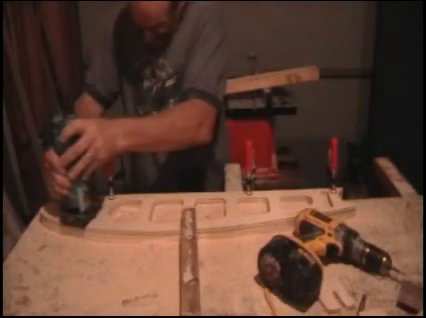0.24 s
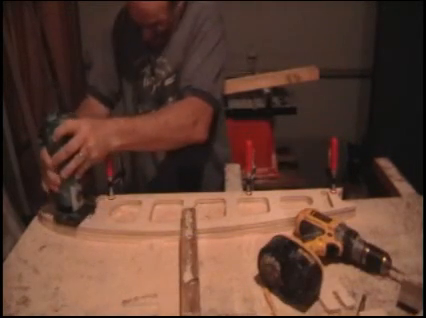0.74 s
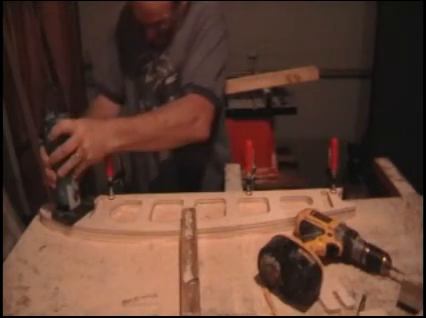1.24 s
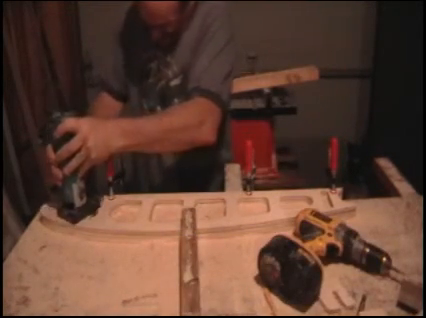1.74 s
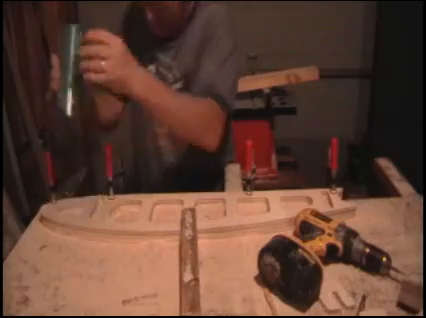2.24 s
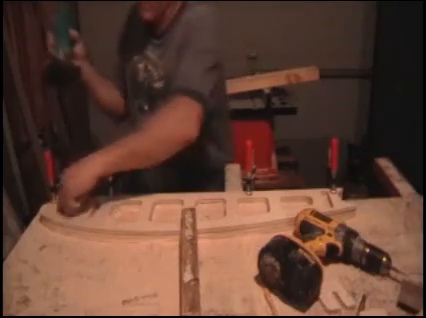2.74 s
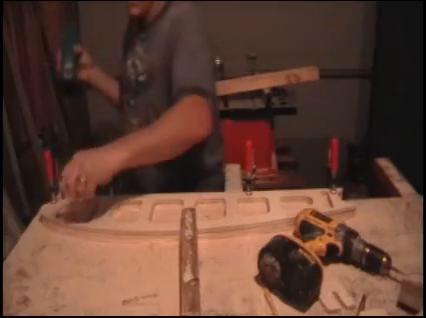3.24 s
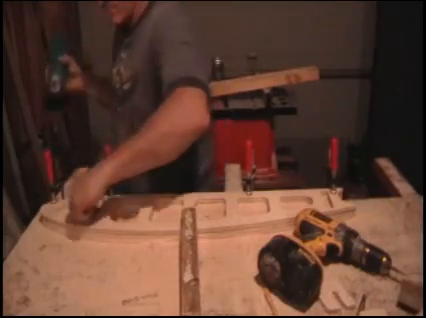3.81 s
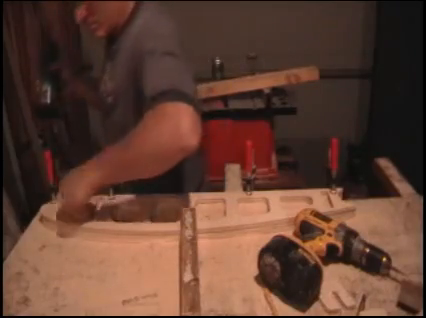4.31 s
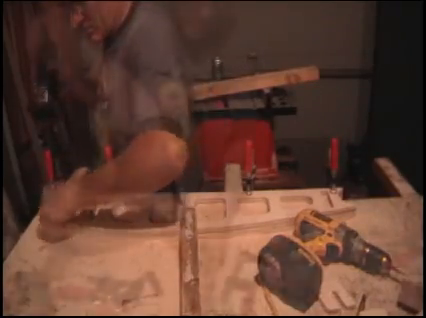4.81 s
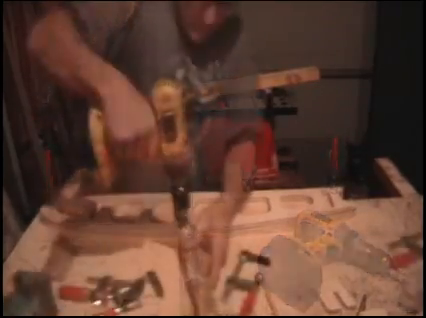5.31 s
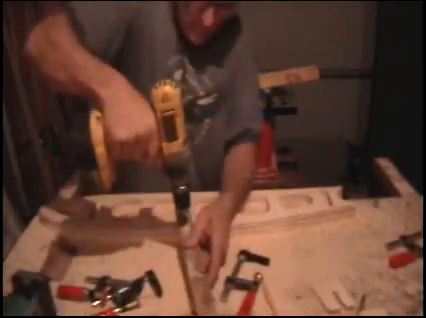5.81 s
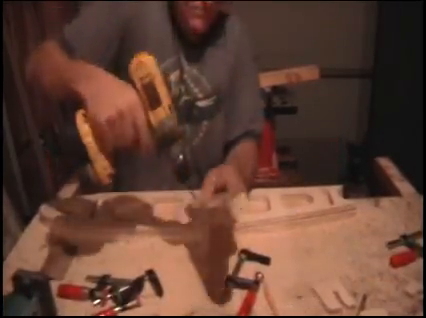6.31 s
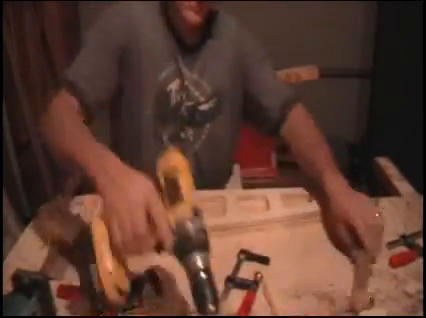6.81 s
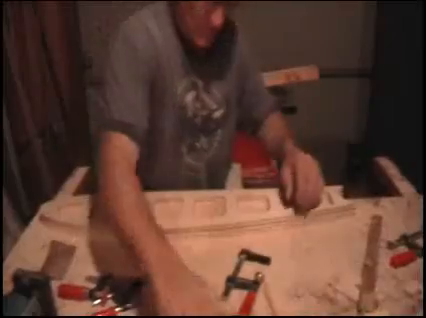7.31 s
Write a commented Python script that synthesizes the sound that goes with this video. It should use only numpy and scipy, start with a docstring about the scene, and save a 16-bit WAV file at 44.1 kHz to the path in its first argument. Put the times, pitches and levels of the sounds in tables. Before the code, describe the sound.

From 0 s a small router roars close by in a garage: rushing air and brush noise, with a rough, buzzing bearing rattle against a plywood template as the motor climbs quickly in pitch. The rattle fades by about 0.8 s, leaving uneven low hums, a wood buzz and a high whine that wavers and dips. Around 2 s the router lifts; the buzz goes and it runs on freely, brighter and steady, with a faint bump at 3.3 s and a dull one at 4.8 s. At 5.1 s it cuts abruptly to a cordless drill, a gritty whirr with gear whine and about nine irregular thumps. Near 6 s it stops with a brief rasp and dies away. Light clicks follow over quiet air, then a hard knock at 6.7 s with clatter and faint steel ringing, and another loud knock at 7.23 s trailed by smaller thuds and ticks. The small microphone sounds thin and overloads softly.

```python
"""A guide bearing rattles along a plywood template under a roar of air as a small router spins up;
then the router is lifted and whines free: knocks are summed partials, air is shaped noise, the shaft is tones.
The scene cuts to a cordless drill boring at a bench, noise plus gear tones, thumping as the bit bites.
The drill stops with a rasp, a strip of wood and a clamp are set down, and small parts click:
sagging thuds with bench rumble, short noise bursts and ringing steel."""
import sys
import numpy as np
from scipy import signal
from scipy.io import wavfile
from scipy.ndimage import uniform_filter1d

SR = 44100
rng = np.random.default_rng(int(sys.argv[2]) if len(sys.argv) > 2 else 0)


def unload_audio(sound):
    """Save the sound as a 16-bit wav file, at the path given as the first command line argument."""
    columns = np.transpose(np.atleast_2d(sound))
    # keep every value between -1 and 1, then stretch to whole-number steps
    steps = np.round(np.clip(columns, -1, 1) * 32767)
    wavfile.write(sys.argv[1], SR, steps.astype(np.int16))


N = 332955

START_S, CUT_S = .13, 5.1  # shaft tones enter; cut from router to drill
TOP_HZ = 478.92  # shaft speed at the top
# speed still missing, as dying terms: (shortfall at the start [Hz], time constant [s])
RUN_UP = [(137.33, .499), (66.14, 1.51)]

# air and brush roar: (time [s], level [dB])
ROAR_LEVEL = [(0, -23), (.08, -27.5), (.16, -34.5), (.21, -28), (.7, -28), (.86, -23), (1.08, -24),
              (1.4, -21), (1.85, -23), (2.07, -21.5), (3.5, -22), (4.3, -22), (4.56, -21), (4.8, -23.5),
              (5.1, -21.5)]
# relative roar spectrum with the base on the wood, then off it: (frequency [Hz], density [dB per Hz])
ROAR_DOWN = [(24, -76), (40, -56), (170, -18), (313, -11), (364, -14), (432, -24), (502, -17.5), (710, 1),
             (1080, -27), (1320, -15), (1870, -19), (2450, -22.5), (7680, -21), (8910, -12.5), (13600, -23),
             (15000, -51)]
ROAR_UP = [(24, -70), (40, -36), (291, -34), (478, -5), (527, -22), (597, -5), (676, -10.5), (804, -3),
           (1650, -7), (3140, -2.5), (5290, -4.5), (5700, -9.5), (6140, -8), (13300, -27), (15000, -27)]
# base off the wood: (time [s], blend from down to up [0-1])
LIFT = [(0, 0.55), (.8, 0.58), (1.3, 0.52), (1.95, 0.55), (2.1, 0.69), (3, 0.67), (5.1, 0.68)]
# plywood buzz under the base: (centre [Hz], width [Hz], boost [dB])
BASE_BUZZ = (204, 65, 7)
LIFTED_S = 2.05  # the buzz is gone from here

# guide bearing on the template: (time [s], hum level [dB])
BEARING_HUM = [(0, -55), (.2, -40), (.45, -41), (.56, -30.5), (.66, -41), (.8, -27), (1.03, -20.5),
               (1.12, -25.5), (1.18, -35), (1.25, -21.5), (1.55, -29.5), (1.66, -35), (1.85, -33),
               (1.92, -28.5), (1.99, -30), (2.03, -58)]
# its rattle: (time [s], level against its mean over the first half second [dB],
# share of odd partials [0-1], treble slope [dB per octave])
RATTLE = [(0, -22.5, 0.34, -7), (.07, -22.5, 0, -12), (.13, -26.5, 0.35, -3), (.165, -33, 0.4, -8),
          (.2, -23, 0.38, -5), (.5, -22.5, 0.58, -3.5), (.7, -25.5, 0.44, -1), (.77, -27, 0.2, 1.5),
          (.84, -56, 0.8, 5)]
# how the plywood sounds each partial: (frequency [Hz], gain [dB])
TEMPLATE = [(480, 0), (640, -8), (950, 5.5), (1250, 0), (1600, 3), (2000, 5.5), (2400, 6), (2900, -6),
            (3800, 6), (4400, 3.5), (5200, 0.5), (6200, -9), (7600, -1), (9800, -12.5)]
# bearing slip: (time [s], bearing turns per shaft turn)
SLIP = [(0, .86), (.03, .838), (.07, .833), (.11, .841), (.15, .856), (.3, .86), (.5, .856), (.8, .8445),
        (1.1, .842), (2.03, .8425)]

# shaft hum: (time [s], level [dB])
SHAFT_HUM = [(.13, -49), (.45, -32.5), (.95, -38), (1.25, -26), (1.45, -31.5), (1.55, -26), (1.88, -24),
             (1.97, -36), (2.1, -30.5), (2.7, -40), (3.2, -34), (3.6, -37.5), (5.1, -35)]
# weaker shaft orders: (multiple of shaft speed, offset from the mains ripple [Hz])
ORDERS = [(1, 120), (2, 0), (3, 0), (12, -120), (13, 0), (23, 0), (24, 0)]
# their levels before wavering: (level at nine tenths speed [dB], level at full speed [dB])
ORDER_LEVELS = [(-65, -36.5), (-53, -44), (-43.5, -43), (-46, -41.5), (-90, -56), (-70, -69), (-51, -52.5)]
WHINE_DB, WHINE_GROW_DB = -25, 32  # level at full speed, loss per unit of missing speed
WHINE_FADE, FADE_RATE = 0.2, 60  # depth and pace [1/s] of fading
# the whine dips briefly: (time [s], half width [s])
WHINE_DIPS = [(.13, .04), (.46, 0.042), (.83, 0.0096), (.92, 0.013), (1.19, 0.01), (1.29, 0.016),
              (1.55, 0.032), (1.97, 0.046), (2.1, 0.035), (2.23, .015), (2.34, 0.0071), (2.41, 0.017),
              (2.64, 0.028), (3.17, 0.011), (3.69, 0.047), (4.47, 0.074)]
DIP_DB = -14

# things bumping the bench: (time [s], level [dB], nominal thud pitch [Hz], rise [ms], fall [ms],
# rumble after it [dB], rumble t60 up to 300 Hz [s], hardness [dB per octave])
BLOWS = [(3.322, -43, 207, 4.1, 13, 9.5, 0.56, 9.5), (4.813, -34, 188, 17, 25, -13.5, 0.81, -68),
         (6.7, 0, 273, 2, 1.6, -16.5, 0.58, 5), (6.762, -24, 302, 4, 12, -5, .5, -2),
         (7.2272, 2, 245, 1.5, 10.4, -16.5, 0.48, -0.5), (7.274, -14.5, 373, 6, 32, -14, 0.38, -10),
         (7.315, -16, 300, 4, 22, -5.5, 0.34, -8), (7.375, -18.5, 306, 3.5, 15, -6, 0.4, -4),
         (7.431, -17, 330, 3, 10, -15, 0.28, -5)]
# the bit bites: (time [s], level [dB], nominal thud pitch [Hz])
BITES = [(5.128, -14, 180), (5.186, -13, 191.7), (5.241, -12, 210), (5.336, -9, 171), (5.404, -10, 202),
         (5.5, -11, 215), (5.618, -8, 225), (5.765, -11, 224), (5.881, -22, 195)]
# every bite: (rise [ms], fall [ms], rumble after it [dB], rumble t60 up to 300 Hz [s],
# hardness [dB per octave])
BITE = (8, 8.5, -10.5, 0.72, -13)
# bench-top modes: (frequency [Hz], nominal t60 that sets the bandwidth [s], relative level [dB])
BENCH = [(80, .2, -34), (110, 0.34, -5.5), (129, 0.16, 2), (173.5, 0.18, 4), (195, 0.26, 2.5),
         (247, 0.077, -8), (294, 0.059, -0.5), (365, 0.18, 2.5), (560, 0.033, -1), (720, 0.092, -7),
         (820, 0.097, -17), (940, 0.055, -43), (1180, 0.037, -13), (1460, .05, -13), (1870, .05, -18)]

# relative drill whirr spectrum: (frequency [Hz], density [dB per Hz])
WHIRR = [(300, -4), (600, -15), (820, -2), (1050, -11.5), (1720, -2), (2600, -4.5), (3600, -1.5),
         (5400, -4.5), (6050, -8), (6700, -3), (7500, -10.5), (9000, -5.5), (9700, -9.5), (13900, -13),
         (15000, -27)]
WHIRR_DB, WHIRR_GROW_DB = -18.5, 0.5  # at the start, change while boring
RUMBLE_DB, RUMBLE_FADE_DB = -23, -10  # at the start, change while boring
STOP_S, DROP_DB, COAST_T60 = 6.018, -9.5, 0.34  # trigger release, step down, dying away [s]
SLOW_SPEED, SPEED_UP_S, SPEED_UP_TIME_S = .95, 5.2, .045  # share of full speed, onset, time constant
# gear mesh tones: (frequency at full speed [Hz])
GEARS_HZ = [3560, 3745, 4905, 5480, 9140]
# each one against the whirr, before wavering: (level while slow [dB], level at full speed [dB])
GEAR_LEVELS = [(-35, -20), (-31, -17), (-11, -16.5), (-33, -20), (-34, -23)]
# brake rasp: (centre [Hz], width [Hz], level before its envelope [dB])
BRAKE = [(675, 76, -17.5), (1370, 360, -23), (1910, 87, -26), (4300, 230, -27), (8700, 800, -58)]
BRAKE_S = 5.995

# relative garage air spectrum: (frequency [Hz], density [dB per Hz])
AIR = [(18, -46), (30, -30), (76, 1), (119, -2.5), (267, -13), (312, -6.5), (497, -25), (612, -14),
       (2030, -20.5), (8690, -33), (15000, -37)]
AIR_DB = -48

# clicks of small parts: (time [s], level before the envelope [dB], centre [Hz], width of each filter pass [Hz])
CLICKS = [(6.146, -39, 9100, 9000), (6.173, -35, 7900, 9100), (6.22, -28.5, 2370, 2450),
          (6.36, -33, 4680, 1500), (6.375, -34, 3380, 4000), (6.701, -13.5, 1800, 4000),
          (6.747, -27, 4000, 6000), (6.767, -16.5, 3180, 3640), (6.803, -11, 2400, 5000),
          (6.829, -22, 6800, 3000), (6.872, -26, 2280, 2000), (6.955, -37, 2100, 1000),
          (7.122, -44, 4000, 6000), (7.202, -38, 2980, 4930), (7.23, -4, 1920, 4550),
          (7.236, -8, 3500, 5560), (7.263, -24, 3000, 5500), (7.323, -12, 3500, 8000),
          (7.357, -26, 7000, 8000), (7.377, -18, 3000, 6000), (7.432, -19, 5300, 7000),
          (7.489, -30.5, 5000, 9000)]
CLICK_TAIL_DB = -24
# steel clamp bar modes: (frequency [Hz], t60 [s], relative level [dB])
CLAMP = [(1690, 0.54, -4), (2140, 0.13, 2), (3520, 0.33, -10.5), (6050, 0.21, -13), (6180, .3, -4),
         (6560, .25, -3), (6720, 0.18, -9), (8520, 0.57, -12)]
# hits that ring the clamp: (time [s], level [dB])
CLAMP_HITS = [(6.803, -36.5), (6.872, -40), (6.93, -48)]

# stereo image of the noise: (frequency [Hz], left-right likeness)
LIKENESS = [(60, 1), (180, 0.79), (540, 0.84), (1620, 0.7), (4860, 0.75), (14600, 0.49)]
# its balance: (frequency [Hz], left over right [dB])
LEAN = [(60, -1), (180, -1.5), (540, -1.5), (1620, 3), (4860, 1.5), (14600, 0.5)]
EDGE_HZ = 14450  # top of the band


def gain_of(db):
    """Decibels to an amplitude factor."""
    return 10 ** (np.asarray(db) / 20)


def evened(x):
    """Scale to rms 1."""
    return x / np.sqrt(np.mean(x ** 2) + 1e-20)


def read(points, hz):
    """Read a curve along a logarithmic frequency axis."""
    f, value = np.transpose(points)
    return np.interp(np.log(hz + 1), np.log(f + 1), value)


def running(start, stop):
    """A softened switch that is on between two times."""
    t = np.arange(N) / SR
    return uniform_filter1d(((t >= start) & (t <= stop)) * 1., size=300)


def follow(rows):
    """Columns at every sample, and a switch that is on only while the table lasts."""
    s, *columns = np.transpose(rows)
    return running(s[0], s[-1]), [np.interp(np.arange(N) / SR, s, c) for c in columns]


def add(mix, s, sound):
    """Lay a sound into the mix at s seconds."""
    part = mix[round(s * SR):][:len(sound)]
    part += sound[:len(part)]


def resonate(x, hz, width_hz):
    """A resonant band of gain 1 around hz."""
    r = np.exp(-np.pi * width_hz / SR)
    return 2 * signal.lfilter([1 - r], [1, -r * np.exp(2j * np.pi * hz / SR)], x).real


def drift(rate):
    """Slow random wandering of rms 1; rate is its pace [1/s]."""
    feedback = [1, -2 * np.exp(-rate / SR), np.exp(-2 * rate / SR)]
    return evened(signal.lfilter([1], feedback, rng.standard_normal(N)))


def tone(hz, wobble_hz):
    """A sine of rms 1 whose pitch wanders by wobble_hz rms."""
    return np.sqrt(2) * np.sin(2 * np.pi * np.cumsum(hz + wobble_hz * drift(296)) / SR)


def hiss(shape_db, patchy_db, flicker_db):
    """Two-channel noise; shape_db is bins by frames, with drifting patches and a shared flicker."""
    frames, hz = N // 256 + 5, np.fft.rfftfreq(1024, 1 / SR)
    a, b, c, d, patches = rng.standard_normal((frames, 513, 5)).T
    patches = uniform_filter1d(patches, size=10, axis=0)
    patches = evened(uniform_filter1d(patches, size=12, axis=1))
    flicker = evened(uniform_filter1d(rng.standard_normal(frames), size=4))
    same = np.clip(read(LIKENESS, hz), -1, 1)[:, None]
    lean = gain_of(read(LEAN, hz) / 2)[:, None]
    left = a + 1j * b
    right = same * left + np.sqrt(1 - same ** 2) * (c + 1j * d)
    bins = np.array([left * lean, right / lean])
    shape = shape_db(hz[:, None], np.arange(frames) * 256 / SR)
    bins *= gain_of(shape + patchy_db * patches + flicker_db * flicker)
    return evened(signal.istft(bins, nperseg=1024, noverlap=768)[1][:, :N])


def struck(modes, force, seconds):
    """Decaying modes set ringing by a force pulse."""
    t = np.arange(round(seconds * SR)) / SR
    ring = sum(gain_of(db - 60 * t / t60) * np.sin(2 * np.pi * hz * t) for hz, t60, db in modes)
    return signal.fftconvolve(ring, force / np.abs(force).sum())


def shaft_hz():
    """The router motor runs up quickly, then creeps towards its top speed."""
    return TOP_HZ - sum(short * np.exp(-np.arange(N) / SR / tau) for short, tau in RUN_UP)


def roar():
    """Cooling air and brush noise; its colour opens and the wood stops buzzing when the base lifts."""
    on, (level_db,) = follow(ROAR_LEVEL)
    buzz_hz, width_hz, buzz_db = BASE_BUZZ

    def shape_db(hz, t):
        down = read(ROAR_DOWN, hz)
        lifted = np.clip(np.interp(t, *np.transpose(LIFT)), 0, 1)
        on_wood = np.clip((LIFTED_S - t) / .1, 0, 1)
        buzz = buzz_db * np.exp(-((hz - buzz_hz) / width_hz) ** 2) * on_wood
        return down + lifted * (read(ROAR_UP, hz) - down) + buzz
    return on * gain_of(level_db) * hiss(shape_db, 1.4, 0.4)


def bearing():
    """Hums once a turn; while pressed hard it knocks twice a turn, unevenly, into the template."""
    on, (hum_db,) = follow(BEARING_HUM)
    pressed, (rattle_db, odd_share, sharp_db) = follow(RATTLE)
    hz = follow(SLIP)[1][0] * shaft_hz()
    turns = np.cumsum(hz + 0.32 * drift(210)) / SR
    flutter = drift(66)
    knocks = np.zeros(N)
    for k in range(2, 34):
        # two equal knocks a turn give even partials; odd ones make them uneven
        share = odd_share * min(k / 7, 1) ** 1.9 if k % 2 else 1
        slope_db = sharp_db * max(np.log2(k / 8), 0)
        waver_db = 2.9 * np.roll(flutter, 9000 * k)  # staggered for each partial
        partial = np.cos(2 * np.pi * k * turns + 0.249 * k ** 1.5)
        knocks += share * gain_of(slope_db + read(TEMPLATE, k * hz) + waver_db) * partial
    rattle = knocks * (1 + 0.3 * uniform_filter1d(rng.standard_normal(N), size=40))  # roughness
    rattle /= np.sqrt(np.mean(rattle[:SR // 2] ** 2))
    hum = np.sqrt(2) * np.sin(2 * np.pi * turns)
    return on * gain_of(hum_db) * hum + pressed * gain_of(rattle_db) * rattle


def motor():
    """Shaft unbalance hums, twelve fan blades whine in and out, and weak orders fill in."""
    hz, (hum_db,) = shaft_hz(), follow(SHAFT_HUM)[1]
    speed = hz / TOP_HZ
    weak = np.zeros(N)
    for (k, shift), levels_db in zip(ORDERS, ORDER_LEVELS):
        level_db = np.interp(speed, [.9, 1], levels_db) + 3.13 * drift(27)
        weak += gain_of(level_db) * tone(k * hz + shift, 4.0 * k ** .5)
    t = np.arange(N) / SR
    dips_db = DIP_DB * sum(np.exp(-((t - s) / half) ** 2) for s, half in WHINE_DIPS)
    fading = np.abs(1 + WHINE_FADE * (drift(FADE_RATE) + 1j * drift(FADE_RATE)))
    whine_db = WHINE_DB + WHINE_GROW_DB * (speed - 1) + dips_db
    whine = gain_of(whine_db) * fading * tone(12 * hz, 3.9)
    return running(START_S, CUT_S) * (gain_of(hum_db) * tone(hz, 0.9) + whine + weak)


def blows():
    """A short thud, then the bench top and what lies on it keep rumbling."""
    out = np.zeros(N)
    t = np.arange(SR // 2) / SR
    dull = signal.butter(2, 1900, fs=SR, output="sos")  # wood damps the treble
    for s, db, hz, rise_ms, fall_ms, after_db, t60, tilt_db in BLOWS + [row + BITE for row in BITES]:
        swell = (1 - np.exp(-(1000 * t / rise_ms) ** 2)) * np.exp(-1000 * t / fall_ms)
        # pitch sags from 0.91 to 0.83 of nominal
        bend = 2 * np.pi * hz * (0.83 * t + 0.18 * 0.011 * (1 - np.exp(-t / 0.025)))
        overtone = gain_of(2.9 * tilt_db - 16.0) * np.sin(3.73 * bend)
        thud = -(np.sin(bend) + overtone) * swell / swell.max()
        shake = signal.sosfilt(dull, rng.standard_normal(len(t)))
        rumble = np.zeros(len(t))
        for f, ring_s, mode_db in BENCH:
            fade_db = -60 * t / t60 * max(f / 300, 1) ** 0.9  # high modes die sooner
            mode = evened(resonate(shake, f, 1.9 / ring_s + 15))
            rumble += gain_of(mode_db + tilt_db * np.log2(f / 200) + fade_db) * mode
        rumble = signal.sosfilt(dull, rumble)
        rumble /= np.sqrt(np.mean(rumble[:2000] ** 2))
        rumble *= gain_of(after_db) * (1 - np.exp(-t / 0.002))
        add(out, s, gain_of(db) * (thud + rumble))
    return out


def drill():
    """Gear whirr and mesh tones, a rumble through the bench, and the brake's rasp."""
    t = np.arange(N) / SR
    progress = np.clip((t - CUT_S) / (STOP_S - CUT_S), 0, 1)
    coasting = np.maximum(t - STOP_S, 0)
    release_db = DROP_DB * np.minimum(coasting / 0.0069, 1) - 60 * coasting / COAST_T60
    on = running(CUT_S, N / SR) * gain_of(release_db)
    level = on * gain_of(WHIRR_DB + WHIRR_GROW_DB * progress)
    speed = 1 - (1 - SLOW_SPEED) * np.exp(-np.maximum(t - SPEED_UP_S, 0) / SPEED_UP_TIME_S)

    whirr = hiss(lambda hz, t: read(WHIRR, hz) + 0 * t, 0.68, 1.0)
    whirr *= 1 + 0.074 * tone(188 * speed, 4.7)  # the armature throbs once a turn
    mesh = np.zeros(N)
    for f, levels_db in zip(GEARS_HZ, GEAR_LEVELS):
        mesh_db = np.interp(speed, [SLOW_SPEED, 1], levels_db) + 3.9 * drift(97)
        mesh += gain_of(mesh_db) * tone(f * speed, f * 0.00129)

    shake = rng.standard_normal(N)
    rumble = evened(sum(gain_of(db) * resonate(shake, f, 1.6 / t60 + 12) for f, t60, db in BENCH[:8]))
    rumble *= gain_of(RUMBLE_DB + RUMBLE_FADE_DB * progress)
    since = np.maximum(t - BRAKE_S, 0)
    rasp = sum(gain_of(db) * evened(resonate(shake, f, width)) for f, width, db in BRAKE)
    brake = rasp * (1 - np.exp(-since / 0.0023)) * gain_of(-60 * since / 0.32)
    return level * whirr, level * mesh + on * rumble + brake


def garage_air():
    """Faint, patchy background noise of the garage, present from the cut onwards."""
    air = hiss(lambda hz, t: read(AIR, hz) + 0 * t, 1.9, 0.99)
    return running(CUT_S, N / SR) * gain_of(AIR_DB) * air


def clicks():
    """Each a few ms of noise in its band, with a short diffuse tail; clamp hits ring steel modes."""
    out = np.zeros(N)
    t = np.arange(SR // 5) / SR
    for s, db, hz, width_hz in CLICKS:
        once = resonate(rng.standard_normal(len(t)), hz, width_hz)
        colour = evened(resonate(once, hz, width_hz))
        snap = (1 - np.exp(-t / 0.00078)) * np.exp(-t / 0.0023)
        tail = gain_of(CLICK_TAIL_DB - 60 * t / 0.5)
        add(out, s, gain_of(db) * colour * (snap + tail))
    for s, db in CLAMP_HITS:
        add(out, s, gain_of(db) * struck(CLAMP, np.ones(2), .6))
    return out


def garage(x, wet_db, t60):
    """Direct sound slightly left, plus sparse reflections that differ per ear."""
    t = np.arange(SR // 2) / SR
    signs = rng.choice([-1., 1.], (2, len(t)))
    sparse = rng.random((2, len(t))) < .05
    taps = signs * sparse * gain_of(-60 * t / t60) * (t > .004)
    taps = signal.lfilter([.45], [1, -.55], taps)  # duller reflections
    taps = signal.sosfilt(signal.butter(2, 420, "high", fs=SR, output="sos"), taps)
    wet = signal.fftconvolve(x[None], taps / np.linalg.norm(taps[0]), axes=1)[:, :N]
    return x * gain_of([[.5], [-.5]]) + gain_of(wet_db) * wet


def scene():
    """Router, then drill and bench; point sources get reflections, noise beds are already stereo."""
    whirr, boring = drill()
    router = garage(motor() + bearing(), -9.5, 0.26)
    bench = garage(boring + blows() + clicks(), -14.5, 0.4)
    return router + roar() + whirr + garage_air() + bench


def record(dry):
    """A small microphone drops the deep bass and overloads softly on the loudest knocks; then the band limit."""
    thin = signal.sosfilt(signal.butter(3, 50, "high", fs=SR, output="sos"), dry)
    held = np.tanh(np.abs(thin) ** 3) ** (1 / 3) * np.sign(thin)
    band = signal.firwin(301, EDGE_HZ, window=("kaiser", 9), fs=SR)
    return signal.oaconvolve(held, band[None], "same")


dry = scene()
out = record(dry)
unload_audio(out)
```